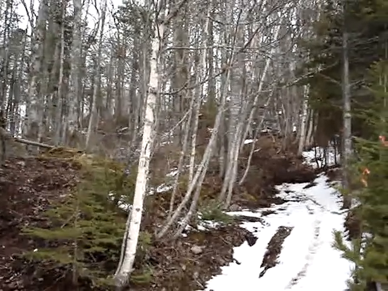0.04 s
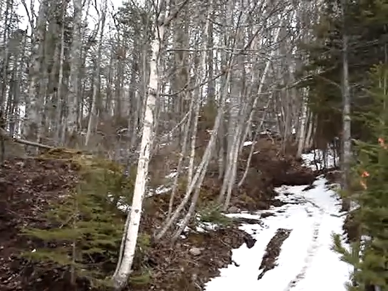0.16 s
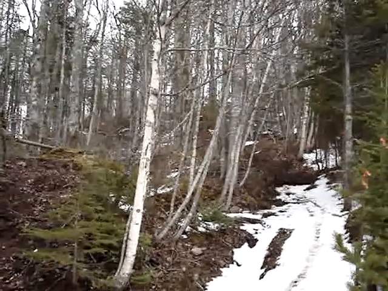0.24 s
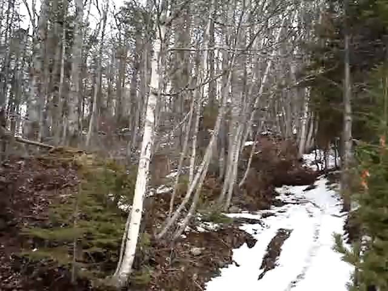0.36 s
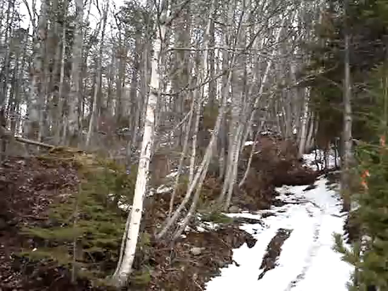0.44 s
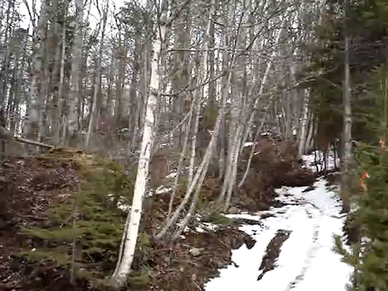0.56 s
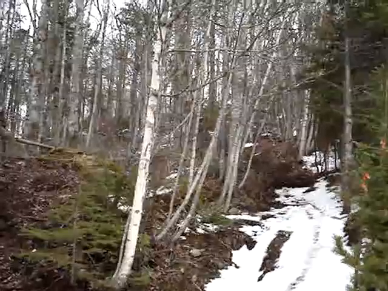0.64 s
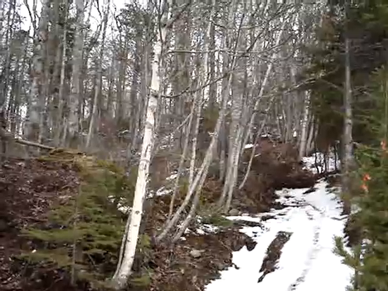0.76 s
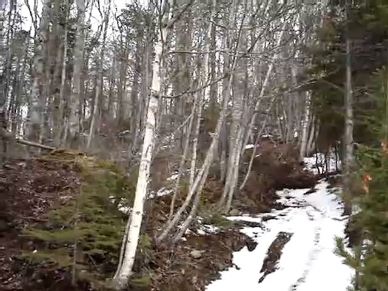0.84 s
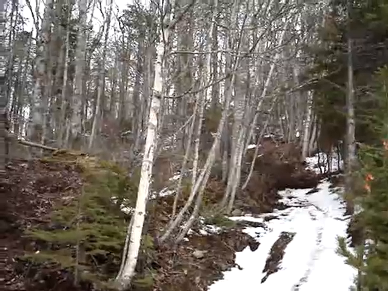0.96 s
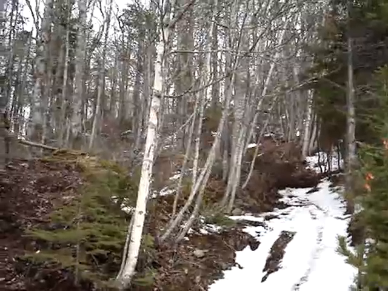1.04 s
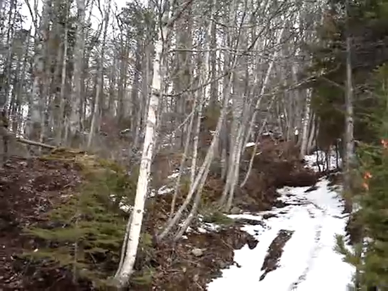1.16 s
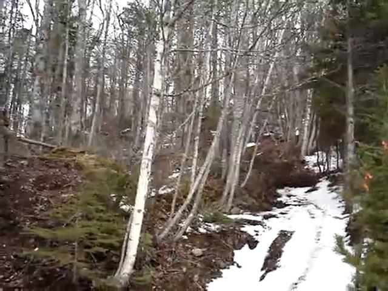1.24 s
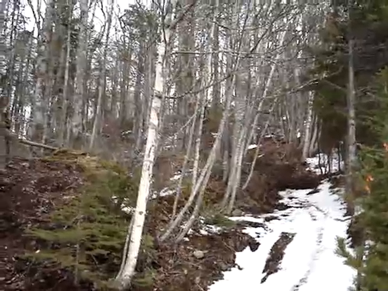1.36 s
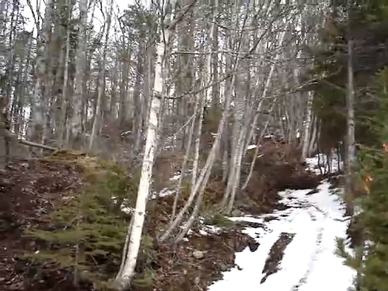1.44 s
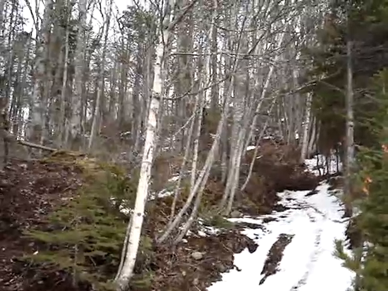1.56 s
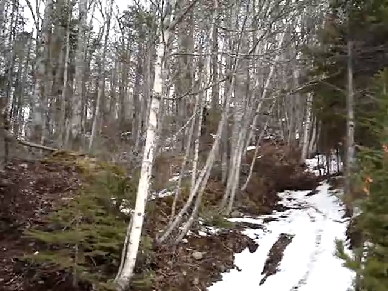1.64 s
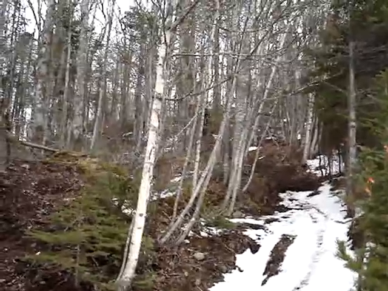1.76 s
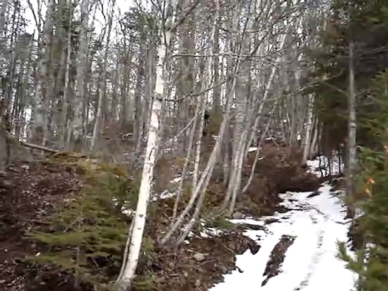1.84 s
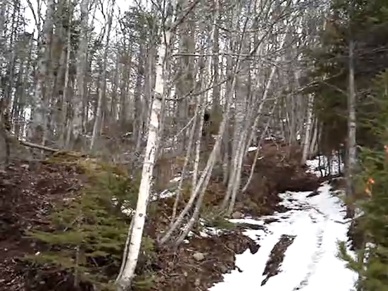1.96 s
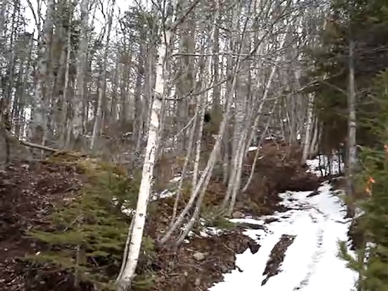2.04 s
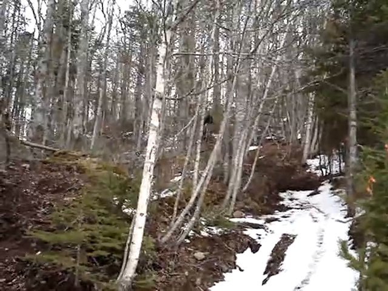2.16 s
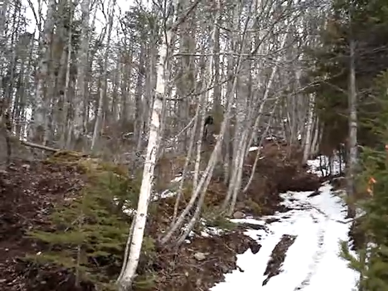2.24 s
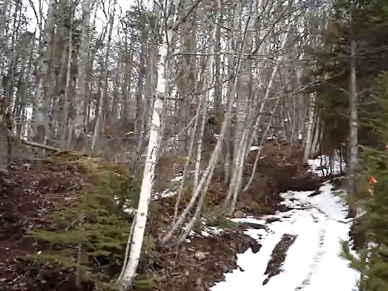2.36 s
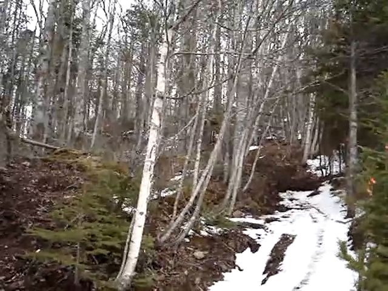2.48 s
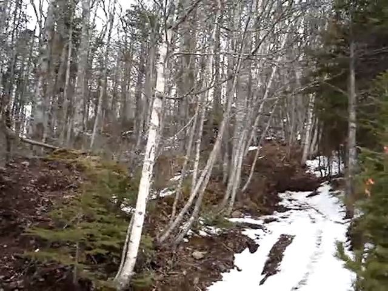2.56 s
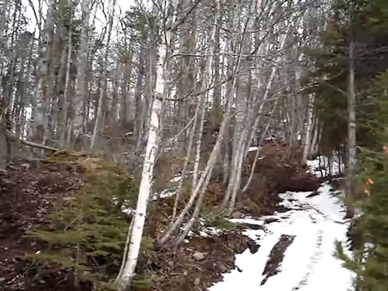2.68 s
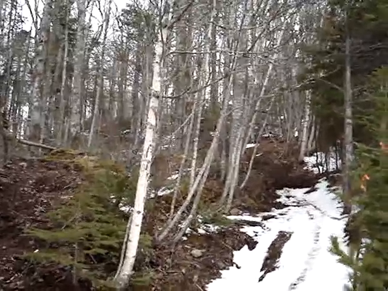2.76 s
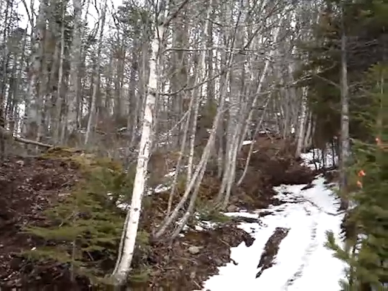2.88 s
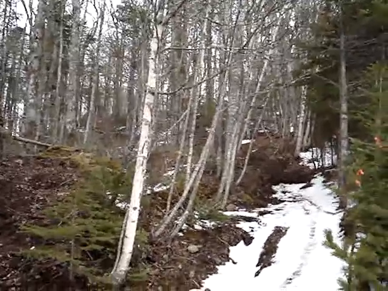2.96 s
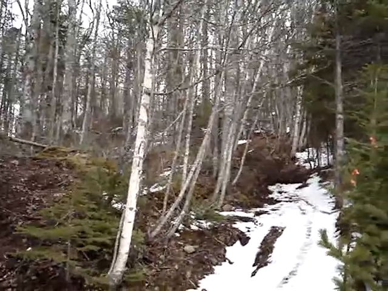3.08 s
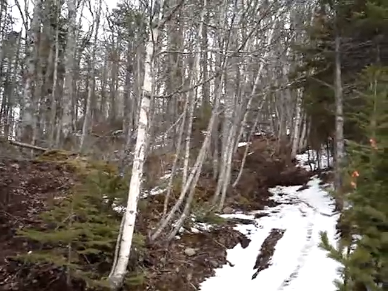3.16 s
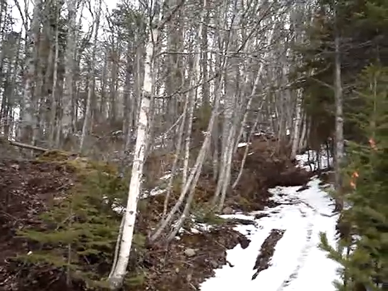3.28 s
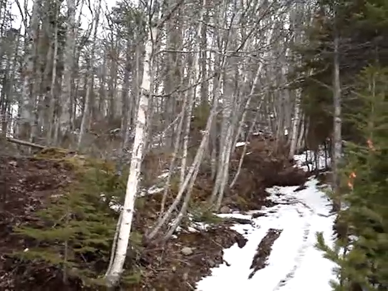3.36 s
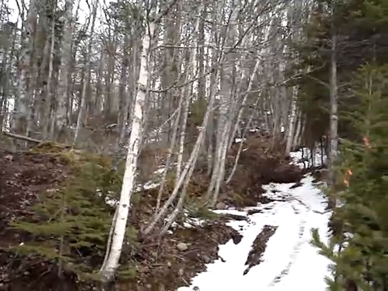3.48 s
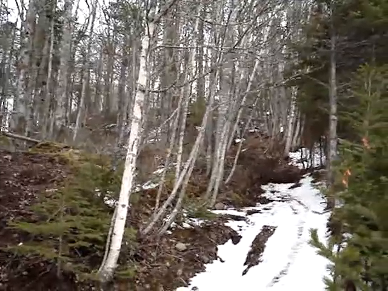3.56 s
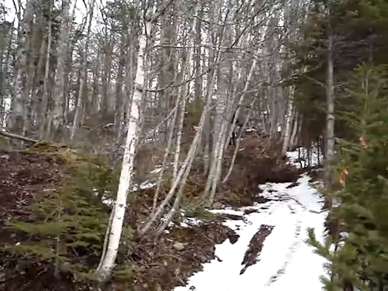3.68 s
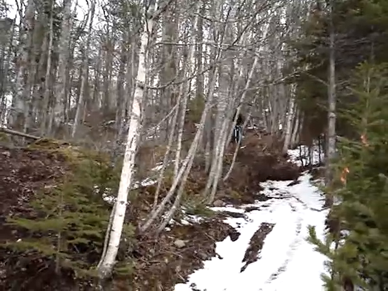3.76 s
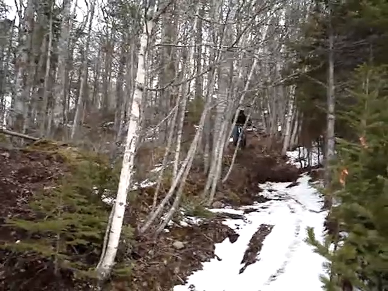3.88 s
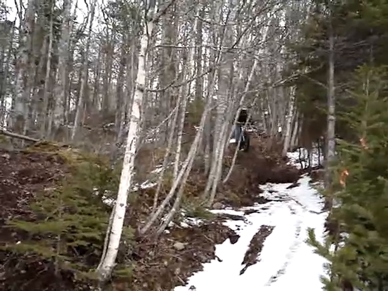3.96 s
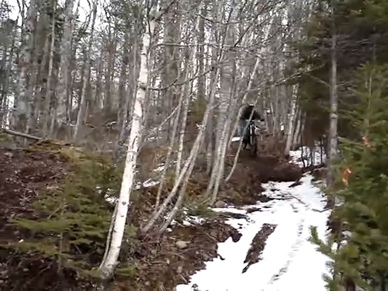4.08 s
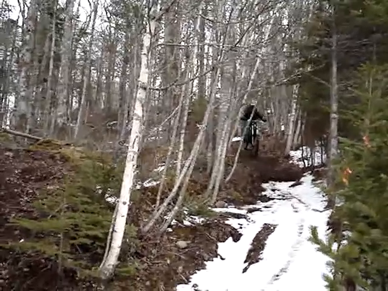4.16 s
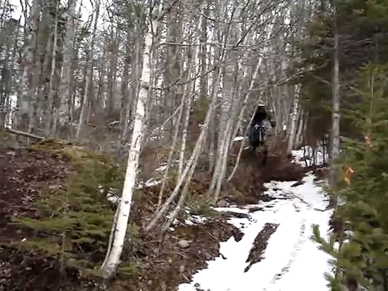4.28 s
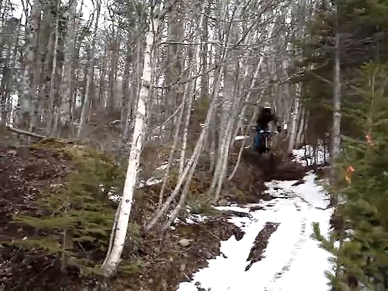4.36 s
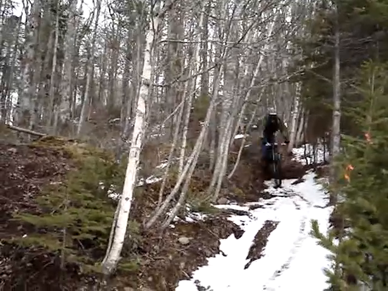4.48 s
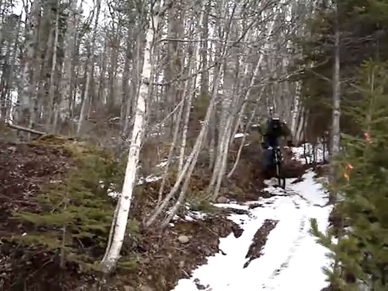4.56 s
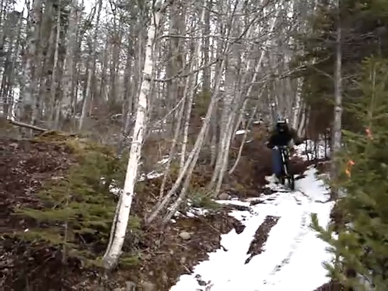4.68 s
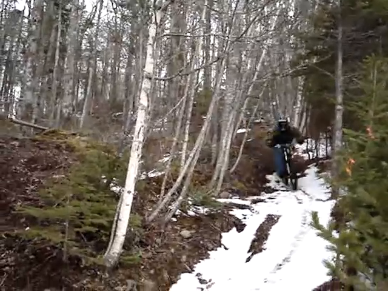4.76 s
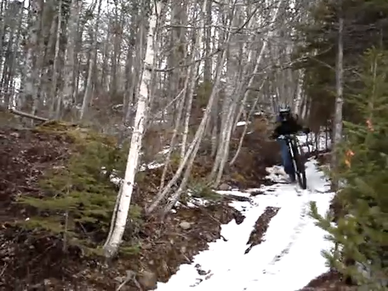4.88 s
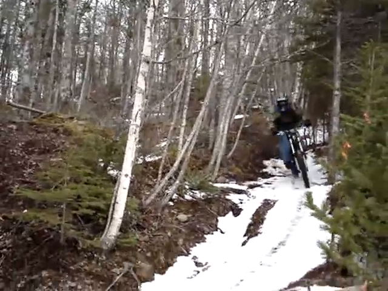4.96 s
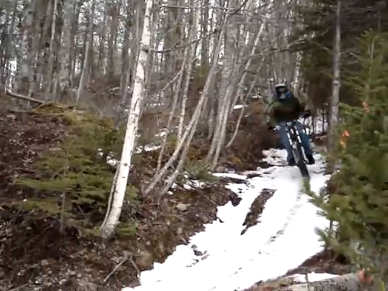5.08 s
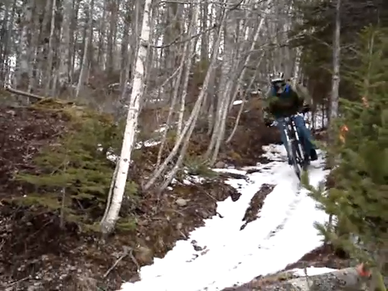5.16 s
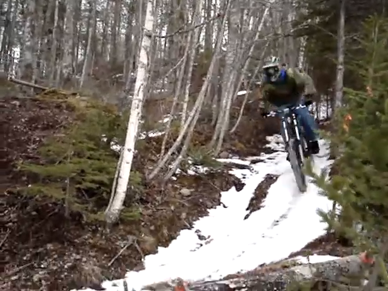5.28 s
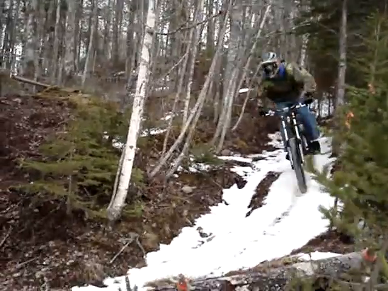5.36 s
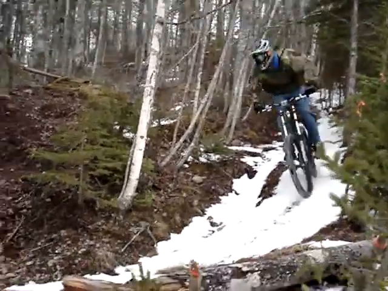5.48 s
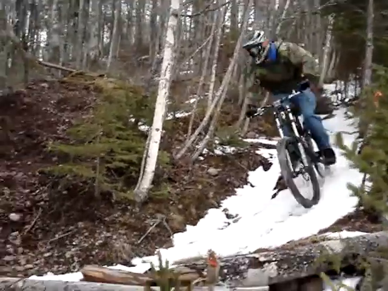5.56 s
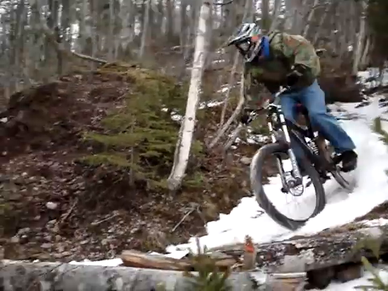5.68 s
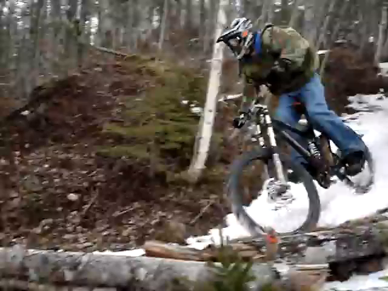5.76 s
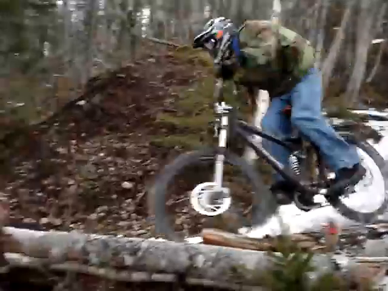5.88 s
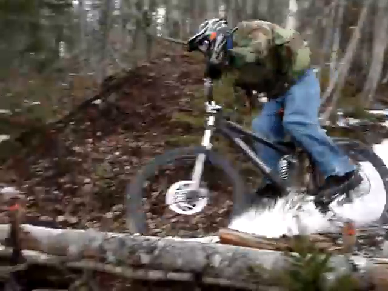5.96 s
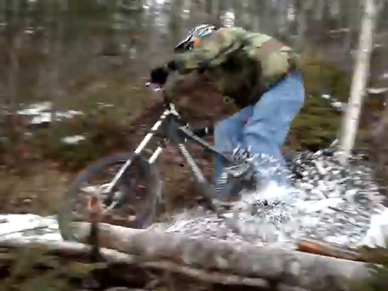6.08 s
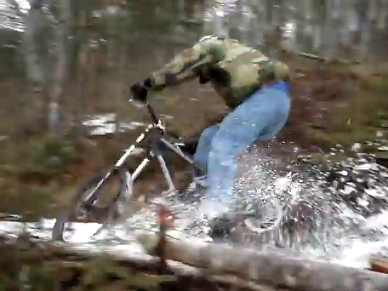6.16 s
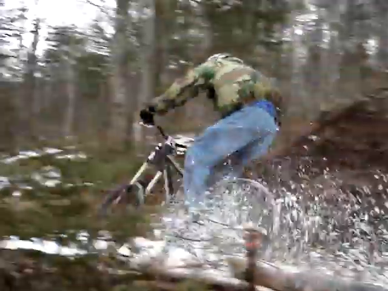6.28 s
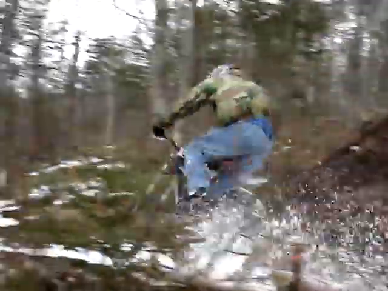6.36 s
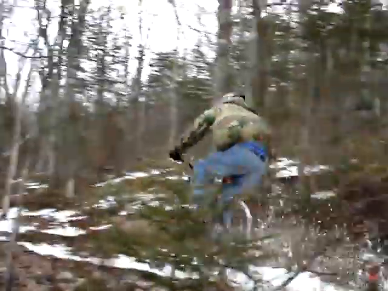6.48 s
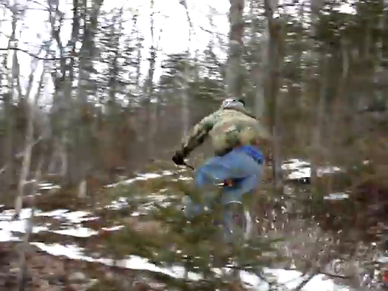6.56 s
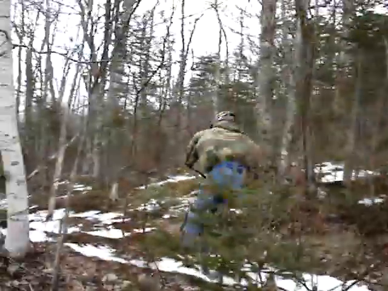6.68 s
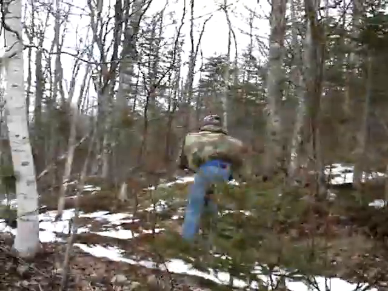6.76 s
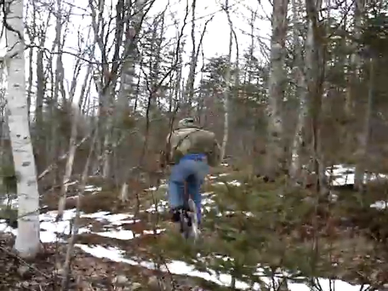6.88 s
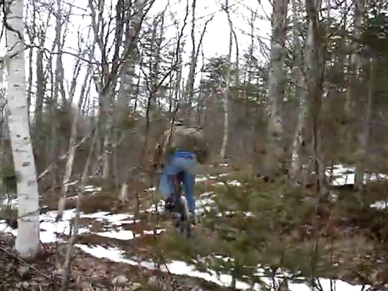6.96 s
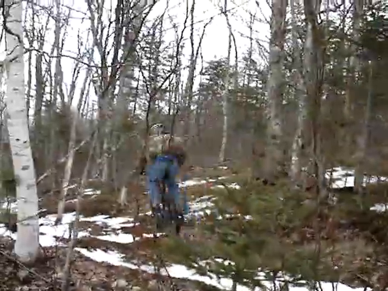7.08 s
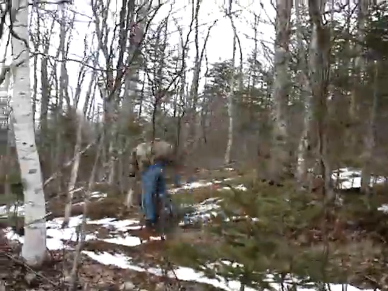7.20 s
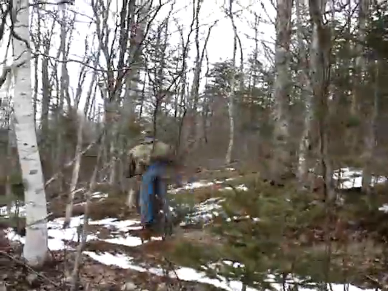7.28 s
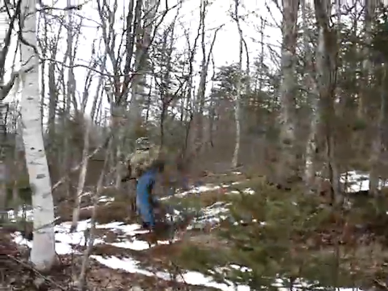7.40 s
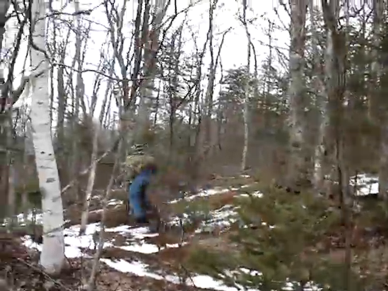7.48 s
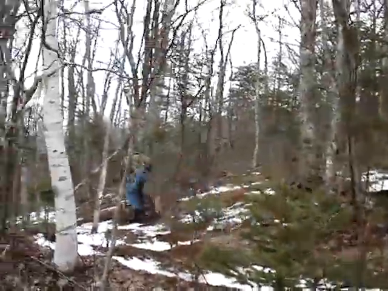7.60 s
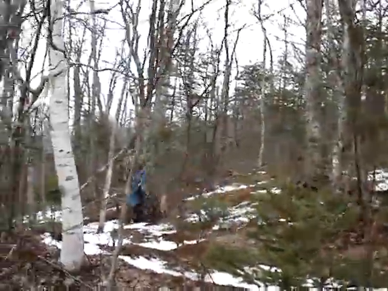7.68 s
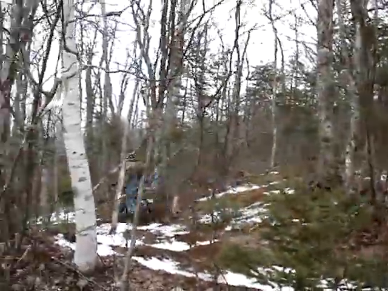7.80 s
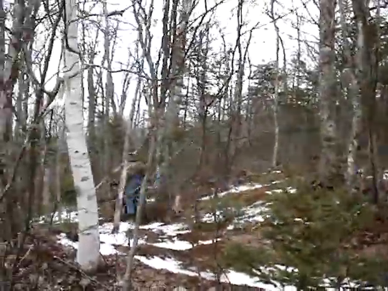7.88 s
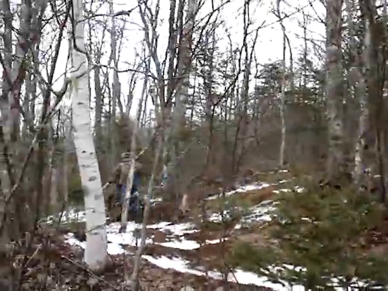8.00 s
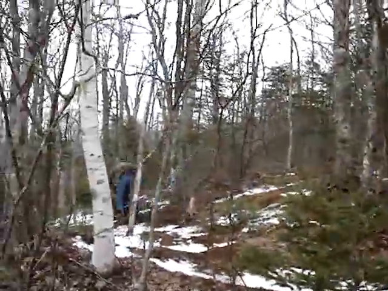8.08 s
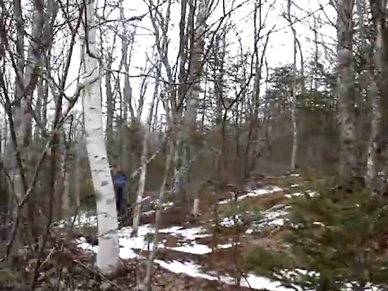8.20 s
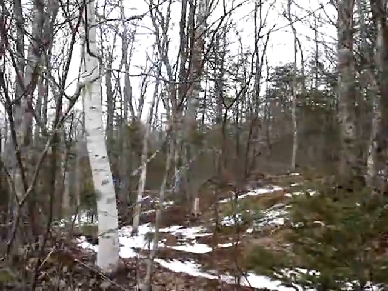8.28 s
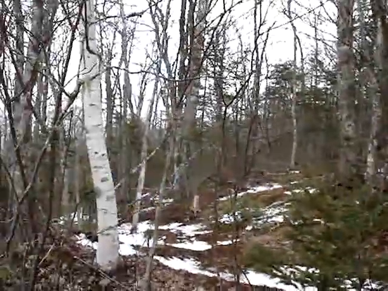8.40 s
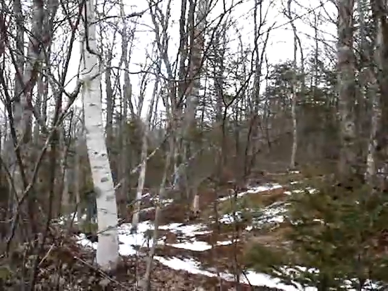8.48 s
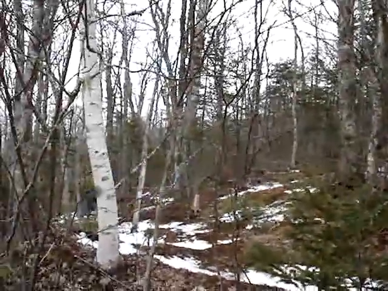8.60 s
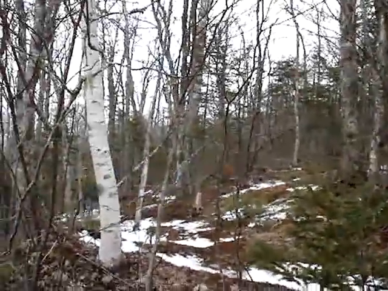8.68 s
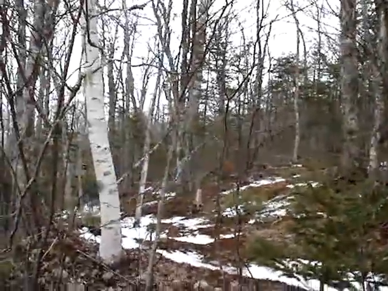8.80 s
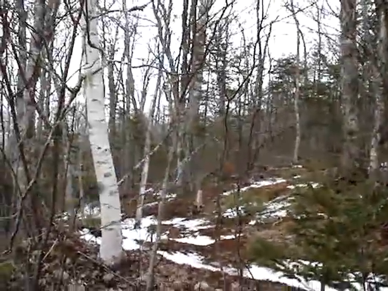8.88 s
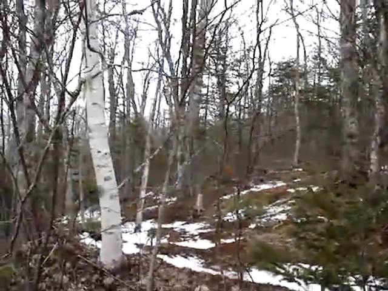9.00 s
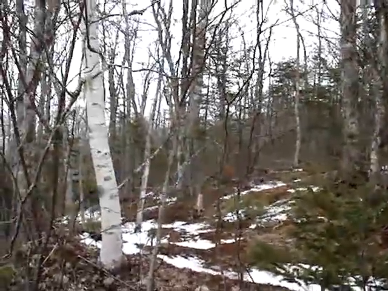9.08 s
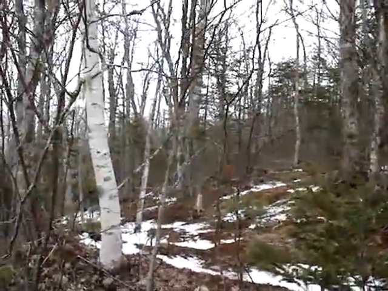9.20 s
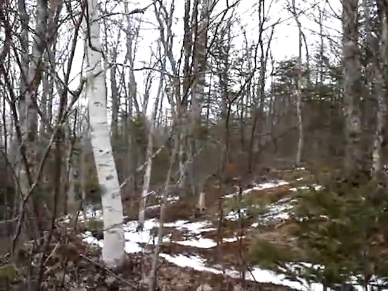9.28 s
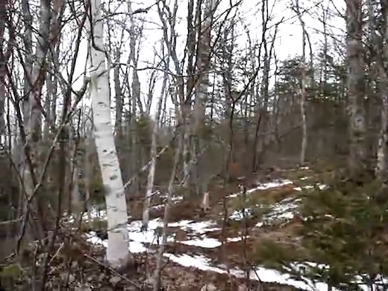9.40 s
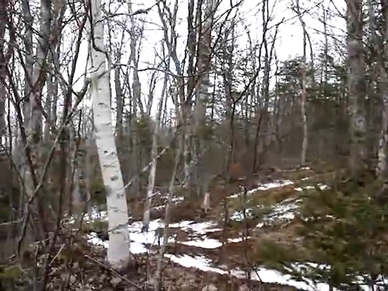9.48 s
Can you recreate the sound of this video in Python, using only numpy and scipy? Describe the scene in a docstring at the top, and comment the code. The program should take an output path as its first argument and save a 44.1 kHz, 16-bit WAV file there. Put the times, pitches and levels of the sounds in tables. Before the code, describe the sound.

Outdoors in quiet woods, a small handheld camera picks up soft hiss, a thin whine and brief wind puffs. Sparse twig snaps grow into a clatter of breaking sticks and crunching tyres as a mountain bike descends. It passes very close around six seconds with hard knocks, thumps and slushy spray, then hisses away, leaving faint freewheel ticks and finger taps on the camera.

```python
"""A mountain bike rolls down a woodland trail over sticks, dirt and wet snow, passes close by and rides off.
Its tyres are grit noise shaped into crunch, spray and boom; sticks are ringing blows with cracks and crumbs.
Late on, the freewheel ticks and fingers tap the body of a small camera, both built on decaying sines.
Low noise is the wind at the microphone early on, later the ground rumbling under the bike; slow pulses
make single wind puffs. Behind it all lie a soft woodland hiss and a thin whine."""
import sys
import numpy as np
from scipy import signal
from scipy.fft import rfft, irfft, next_fast_len
from scipy.io import wavfile
from scipy.ndimage import uniform_filter1d

SR = 44100
rng = np.random.default_rng(int(sys.argv[2]) if len(sys.argv) > 2 else 0)


def dump_mix(stems):
    """Bounce the given channels to the path in sys.argv[1] as a 16-bit WAV at rate SR."""
    frames = np.atleast_2d(stems).T  # one column per channel
    limited = np.clip(frames, -1, 1)  # hard clip at full scale
    pcm = np.round(limited * 32767).astype(np.int16)
    wavfile.write(sys.argv[1], SR, pcm)


N = 420713

# Rolling tyres as the bike nears, passes and leaves.
# Each row: time in seconds, crunch level in dB, spray level in dB, tyre boom level in dB.
ROLLING = [(0.0, -53.5, -58, -63), (0.3, -62.5, -69, -85), (1.0, -54.5, -54.5, -61.5),
           (1.6, -54, -53.5, -59.5), (2.4, -52, -47.5, -53.5), (3.3, -46, -50, -51),
           (3.6, -45, -42.5, -53.5), (4.0, -42, -43.5, -47.5), (4.43, -48, -48.5, -58),
           (4.79, -35, -38, -38), (5.02, -40, -40.5, -45.5), (5.21, -38, -34.5, -47),
           (5.4, -39.5, -38.5, -45), (5.62, -34.5, -33, -38), (5.675, -34.5, -36, -43),
           (5.74, -25.5, -30.5, -40), (5.88, -25, -28, -36), (5.98, -22, -28.5, -39),
           (6.045, -25, -30, -32.5), (6.16, -27.5, -31.5, -34), (6.4, -31, -31, -37.5),
           (7.0, -37.5, -32, -42), (7.29, -39, -34, -44.5), (7.42, -38.5, -32.5, -36),
           (7.8, -45.5, -40.5, -48), (7.97, -43, -38, -41.5), (8.3, -54.5, -48, -52.5),
           (8.7, -49.5, -46, -52), (9.0, -55.5, -50.5, -56.5), (9.54, -51.5, -45, -48.5)]


def amp(db):
    """Turns decibels into a linear gain."""
    return 10 ** (np.asarray(db) / 20)


def evened(x):
    """Scales a sound to an rms of 1."""
    return x / np.sqrt(np.mean(x ** 2) + 1e-20)


def curves(rows):
    """Every column of a table at every sample."""
    s, *columns = np.transpose(rows)
    return [np.interp(np.arange(N) / SR, s, c) for c in columns]


def add(mix, s, sound):
    """Adds a sound to the mix in place, from s seconds on."""
    part = mix[round(s * SR):][:len(sound)]
    part += sound[:len(part)]


def coloured(x, spectrum):
    """Filters x by a spectrum drawn over log frequency, flat beyond its end points."""
    f, db = np.transpose(spectrum)
    size = next_fast_len(len(x))
    hz = np.fft.rfftfreq(size, 1 / SR)
    gain = amp(np.interp(np.log(hz + 1), np.log(f + 1), db))
    return irfft(rfft(x, size) * gain, size)[:len(x)]


def resonate(x, hz, width_hz):
    """A resonance that may glide: shifts the curve hz down to zero, smooths, and shifts back."""
    turn = np.exp(2j * np.pi * np.cumsum(hz * np.ones(len(x))) / SR)
    r = np.exp(-np.pi * width_hz / SR)
    return 2 * (turn * signal.lfilter([1 - r], [1, -r], x / turn)).real


def flicker(per_s):
    """Slow random curve within +-1.6 that heads for a new value per_s times a second."""
    steps = rng.standard_normal(int(N / SR * 400) + 2)
    return np.interp(np.arange(N) / SR * min(per_s, 400), np.arange(len(steps)), np.clip(steps, -1.6, 1.6))


def grit(per_s, spread_db, bed, clump_db, clumps_per_s):
    """Breaking crystals: clicks of uneven size over a bed of finer ones, arriving in clumps."""
    draw, size, fine = rng.random(N), rng.exponential(1, N), rng.standard_normal(N)
    clicks = np.sign(fine) * amp(spread_db * np.minimum(size, 4)) * (draw < per_s / SR)
    return (evened(clicks) + bed * fine) * amp(clump_db * flicker(clumps_per_s))


def tyres():
    """Snow packs with a dull crunch, slush flies off as hiss, the tyre cavity booms."""
    # Colour of the spray. Each row: frequency in Hz, relative level in dB.
    spray_spectrum = [(710, -28), (1200, -25), (1770, 1.5), (3020, 3), (3450, 3.5), (6360, -2),
                      (10000, -17), (13000, -82), (22000, -120)]
    crunch_db, spray_db, boom_db = curves(ROLLING)
    along, wet = slush()

    crunch_hz = 880 * (1 + 0.25 * flicker(10))  # the crunch drifts about one pitch
    crunch = resonate(resonate(grit(800, 2.25, 0.77, 2.5, 60), crunch_hz, 1500), crunch_hz, 2400)
    crunch = signal.lfilter(*signal.butter(2, [380, 2600], "band", fs=SR), crunch)

    # a bright band that rises along the wet stretch, and fizz above it
    band_hz = 4500 + (5760 - 4500) * along
    band_dry_db, band_wet_db, fizz_dry_db, fizz_wet_db = -12, -3.5, -9.5, -6  # against the broad spray
    band_db = band_dry_db + (band_wet_db - band_dry_db) * wet
    fizz_db = fizz_dry_db + (fizz_wet_db - fizz_dry_db) * wet
    fizz_db = fizz_db - 7.5 * (1 - along) * (1 - wet)  # dry ground ahead of the snow fizzes less
    drops, mist = grit(2000, 4.5, 0.37, 2.9, 60), grit(4000, 2.7, 0.35, 5.6, 60)
    band = resonate(resonate(drops, band_hz, 1100), band_hz, 1400)
    fizz = resonate(resonate(mist, 7860, 2100), 6540, 1400)
    spray = evened(coloured(grit(2000, 4.0, 1.0, 3.2, 55), spray_spectrum))
    spray = spray + amp(band_db) * evened(band) + amp(fizz_db) * evened(fizz)

    ahead_hz, past_hz = 217, 254  # air cavity of the tyres, a little higher from behind
    tyre_hz = ahead_hz + (past_hz - ahead_hz) * along
    boom = resonate(resonate(grit(400, 1.54, 0.79, 2.8, 25), tyre_hz, 204), tyre_hz, 340)

    layers = surging(crunch_db, column=2) * evened(crunch)
    layers = layers + surging(spray_db, column=3) * evened(spray)
    # each surge also thumps the tyre, 12 dB under its crunch
    return layers + surging(boom_db, column=2, under_db=-12) * evened(boom)


def surging(steady_db, column, under_db=0):
    """The steady level of a tyre layer with the surges added in power."""
    # The tyres bite through crust in surges.
    # Each row: centre in seconds, length in seconds, crunch level in dB, spray level in dB.
    surges = [(0.082, .16, -52, -55), (0.898, .03, -66, -47), (1.067, 0.15, -55, -56),
              (1.178, 0.025, -58, -49), (1.523, .02, -59, -45.5), (1.598, 0.032, -52, -45),
              (2.078, 0.053, -52, -42), (2.242, 0.026, -44.5, -37), (3.431, 0.073, -42, -34.5),
              (3.47, 0.034, -34.5, -30.5), (3.579, 0.026, -38, -43), (4.108, 0.087, -46, -39),
              (4.172, 0.081, -33.5, -47), (4.203, 0.048, -36, -29.5), (4.253, 0.065, -45, -39),
              (4.345, 0.035, -38, -34.5), (4.429, 0.027, -40.5, -33.5), (4.476, 0.02, -40, -38.5),
              (4.54, 0.02, -40, -36), (4.705, 0.04, -35, -42), (4.742, 0.033, -31, -37),
              (4.837, 0.03, -37, -44), (4.617, 0.029, -29.5, -31.5), (4.641, .04, -43, -31.5),
              (4.77, 0.03, -25, -33), (4.797, 0.043, -44, -33), (4.9, 0.029, -34, -33.5),
              (5.086, 0.088, -32, -52), (5.195, 0.11, -35, -46), (5.269, 0.026, -30.5, -38),
              (5.61, 0.018, -22, -46), (5.709, 0.063, -22.5, -37), (5.932, 0.097, -20.5, -40),
              (5.956, 0.029, -20, -35), (6.084, 0.061, -17, -36), (6.12, 0.055, -23, -42),
              (6.162, 0.17, -28, -27.5), (6.302, 0.06, -25, -33), (6.676, 0.12, -27.5, -34),
              (6.704, 0.048, -27.5, -34), (6.86, 0.066, -28.5, -50), (7.032, 0.022, -32, -48),
              (7.187, 0.03, -30, -39), (7.261, 0.06, -30.5, -25.5), (7.325, 0.03, -27, -26.5),
              (7.428, 0.06, -31, -36), (7.596, 0.034, -40, -32), (7.737, 0.049, -37, -33.5),
              (7.983, 0.061, -37, -36), (8.067, 0.034, -45, -38), (8.195, 0.049, -40.5, -45),
              (8.432, 0.046, -67, -39), (8.504, 0.033, -49, -39)]
    rise, fall = 0.2, 0.52  # shares of a surge's length
    power = amp(steady_db) ** 2
    for row in surges:
        length = np.clip(row[1], .01, .2)
        u = np.arange(0, 1, 1 / (length * SR))
        shape = np.minimum(np.minimum(u / rise, (1 - u) / fall), 1)
        add(power, row[0] - length / 2, (amp(row[column] + under_db) * shape) ** 2)
    return np.sqrt(power)


def slush():
    """How far along the wet stretch the bike is (0-1), and how wet the ground is (0-1)."""
    from_s, to_s, edge_s = 4.67, 7.47, 0.29
    t = np.arange(N) / SR
    along = np.clip((t - from_s) / (to_s - from_s), 0, 1)
    wet = np.clip(np.minimum(t - from_s, to_s - t) / edge_s + .5, 0, 1)
    return along, wet


def snaps():
    """Each break is a blow that rings briefly, a bright crack, and crumbs falling after."""
    # Sticks and crust breaking; each sounds 1.22 ms after its listed time.
    # Each row: time in seconds, knock level in dB, knock pitch in Hz, crack level in dB, crack pitch in Hz.
    sticks = [(0.927, -23.5, 520, -41.5, 3480), (1.212, -35, 650, -48, 3500), (1.353, -38, 700, -40, 2400),
              (1.746, -32, 800, -37, 4300), (1.749, -27.5, 480, -40, 2400),
              (1.896, -28.5, 537, -37.5, 2930), (2.064, -35, 794, -23.5, 5150),
              (2.229, -47, 1950, -33.5, 2550), (2.863, -23.5, 1110, -30, 2040),
              (2.866, -26, 1400, -35, 3400), (3.175, -25, 594, -50, 2680), (3.3935, -14, 1310, -22.5, 2200),
              (3.3945, -6.5, 338, -39, 2000), (3.401, -23, 750, -40, 2400),
              (3.4483, -16, 1240, -14.5, 2500), (3.4493, -14, 1880, -25, 5200),
              (3.4605, -30, 1000, -39, 2600), (3.4715, -33, 900, -30, 4500), (3.574, -28, 982, -34, 2690),
              (3.793, -22.5, 1030, -44, 3070), (3.89, -23.5, 1070, -49, 4210),
              (4.006, -18.5, 996, -27.5, 3400), (4.085, -20.5, 1010, -23, 3430),
              (4.117, -19, 1030, -30, 3020), (4.149, -16.5, 1100, -30, 3620), (4.18, -21, 1140, -23, 3050),
              (4.196, -25, 1100, -29, 3000), (4.3275, -19, 1170, -38, 2500), (4.335, -20, 1230, -36, 2500),
              (4.416, -24, 1700, -27, 3000), (4.421, -27, 1220, -31, 3700),
              (4.461, -14.5, 450, -27.5, 7000), (4.4605, -19, 1400, -33, 3500),
              (4.531, -15.5, 1350, -24.5, 3200), (4.537, -27, 1500, -29, 4300),
              (4.566, -22, 1530, -30, 2150), (4.596, -25, 1420, -33, 3000), (4.615, -17, 1100, -33, 2530),
              (4.645, -26, 1200, -24, 4170), (4.688, -20, 493, -27.5, 4870), (4.704, -17, 600, -37, 5500),
              (4.7315, -13, 450, -33, 3100), (4.744, -19, 810, -24.5, 3500), (4.757, -12, 1350, -27, 4800),
              (4.761, -16, 1430, -17, 4800), (4.765, -27, 700, -16.5, 6730), (4.769, -18, 577, -16, 4500),
              (4.78, -29, 1000, -31, 5200), (4.792, -9.5, 470, -29, 4600), (4.816, -30, 1000, -28, 6560),
              (4.829, -23, 1000, -31, 3800), (4.9572, -13, 1340, -21, 3900),
              (4.9588, -1.5, 850, -15.5, 3160), (4.9965, -12.5, 784, -26, 2000),
              (5.542, -16, 637, -26, 5090), (5.601, -13.5, 820, -37, 2000), (5.686, -8.5, 850, -42, 2130),
              (5.699, -3.5, 776, -40, 2000), (5.722, -3, 620, -40, 2000), (5.762, -6, 795, -42, 2060),
              (5.7645, -1.5, 810, -44, 2000), (5.768, -9, 794, -44, 2000), (5.777, -7.5, 844, -39, 2000),
              (5.81, -19, 1050, -38, 2000), (5.829, -33, 840, -21, 2900), (5.858, -14, 1100, -31, 2000),
              (5.897, -16, 795, -38, 2260), (5.924, -1, 1000, -31, 2000), (5.949, -14, 1280, -16.5, 5270),
              (5.954, -2.5, 970, -25, 5180), (6.021, -29, 1600, -16, 5050), (6.064, 3, 1130, -35, 2030),
              (6.0735, -5, 1400, -34, 2000), (6.08, -7, 1310, -33, 2000), (6.0835, -3, 1300, -30, 2000),
              (6.087, -9, 1390, -33, 2000), (6.0945, -5, 840, -30, 2000), (6.0985, -2, 750, -36, 2000),
              (6.1045, -9, 900, -36, 2000), (6.279, -15, 1210, -24, 2050), (6.289, -14, 1620, -30, 2050),
              (6.307, -23, 1020, -15, 2390), (6.314, -26, 1500, -19, 2390), (6.376, -23, 780, -23, 2470),
              (6.421, -18, 1830, -20, 2350), (6.453, -30, 1980, -14.5, 2630), (6.527, -17, 1730, -21, 2600),
              (6.531, -25, 1500, -18, 2500), (6.561, -16, 1900, -22, 4850), (6.577, -23, 1500, -20, 2200),
              (6.613, -17, 1810, -21, 2400), (6.658, -24, 1500, -19.5, 2600), (6.703, -7.5, 860, -19, 2040),
              (6.729, -27, 1500, -26, 3600), (6.825, -27, 1200, -23.5, 3000), (6.848, -11, 780, -37, 2200),
              (6.881, -34, 1040, -18.5, 4540), (7.029, -19, 1110, -24, 1990), (7.15, -14.5, 300, -32, 2400),
              (7.156, -7, 296, -38, 2000), (7.175, -12.5, 930, -22, 2300), (7.176, -19, 1700, -35, 2700),
              (7.194, -26, 1500, -26, 2200), (7.235, -18, 2740, -17.5, 5700),
              (7.246, -22, 1680, -13.5, 3360), (7.258, -18, 1380, -21, 6140), (7.3, -32, 1800, -21, 2800),
              (7.316, -18, 1900, -22.5, 2400), (7.322, -12, 1210, -22, 2190), (7.408, -15, 725, -28, 3500),
              (7.424, -34, 1290, -34, 2200), (7.436, -17, 786, -38, 2200), (7.4603, -20, 825, -19, 6350),
              (7.4608, -18, 3320, -32, 3400), (7.5145, -14, 3450, -36, 3380), (7.515, -17, 524, -36, 3400),
              (7.5185, -19, 3500, -36, 3400), (7.5215, -22, 2700, -36, 3400),
              (7.716, -20.5, 800, -24.5, 3800), (7.718, -16, 1780, -26, 2580),
              (7.852, -29, 2000, -26, 3000), (7.947, -20, 350, -40, 2400), (8.074, -25.5, 1460, -42, 2400),
              (8.177, -25, 644, -35, 2100), (8.241, -29, 1700, -31, 3150), (8.621, -28, 1640, -27, 3200),
              (8.827, -43, 1500, -38, 2680)]
    # Shared colour of the cracks. Each row: frequency in Hz, relative level in dB.
    crack_spectrum = [(900, -41), (2000, 2), (3500, 0), (6000, 3.5), (8000, -0.5), (10500, -13)]
    out, t = np.zeros(N), np.arange(2600) / SR
    rows = sticks + twigs()
    noise = rng.standard_normal((len(rows), 3, len(t)))
    decay = amp(-60 * t / 0.013)
    for (s, knock_db, hz, crack_db, crack_hz), (low, high, lumps) in zip(rows, noise):
        # lumpy tail that starts around 14.5 dB down
        crumbs = amp(-14.5 - 60 * t / 0.045 + 0.71 * evened(uniform_filter1d(lumps, size=60)))

        blow = decay * np.minimum(t * hz / 0.67, 1)  # builds within a cycle
        splinters = evened(resonate(resonate(low, 0.96 * hz, 1.8 * hz), 0.62 * hz, 2.6 * hz))
        modes = np.sin(2 * np.pi * hz * t) + 0.13 * np.sin(2 * np.pi * 2.31 * hz * t)
        knock = blow * (modes + 0.2 * splinters) + 0.27 * crumbs * splinters

        bright = evened(coloured(high, crack_spectrum))
        own_pitch = evened(resonate(resonate(bright, crack_hz, 1600), crack_hz, 3000))
        bright = 0.56 * bright + own_pitch
        split = 0.99 * amp(-60 * t / 0.0034) * np.sin(2 * np.pi * crack_hz * t)  # one sharp click
        crack = (decay + crumbs) * evened(bright) + split
        add(out, s + 0.00122, amp(knock_db) * knock + amp(crack_db) * crack)
    return thin(out)


def twigs():
    """Forty small breaks like those of the sticks, at random times, as loud as the tyres are near."""
    s, pitch, size, bright = rng.random((40, 4)).T
    s = np.sort(s) * N / SR
    crunch_db, spray_db, _ = (c[(s * SR).astype(int)] for c in curves(ROLLING))
    knock_db = crunch_db + 14 - 8 * size
    crack_db = spray_db + 9 - 8 * size
    return list(zip(s, knock_db, 1000 * (.6 + 1.2 * pitch), crack_db, 3550 * (1.25 + bright)))


def thin(x):
    """Small things radiate little bass: a high-pass at 260 Hz."""
    return signal.lfilter(*signal.butter(2, 260, "high", fs=SR), x)


def freewheel():
    """Pawls drop over the ratchet teeth, fading within each spell of coasting."""
    # Spells of ticking. Each row: first tick in seconds, end in seconds, level of the first tick in dB.
    spells = [(9.0905, 9.245, -29), (9.341, 9.4, -33)]
    ticks_per_s, fade_db_per_s = 59.8, 45
    out, t = np.zeros(N), np.arange(200) / SR
    tick = amp(-60 * t / .003) * (np.sin(2 * np.pi * 3100 * t) + .8 * np.sin(2 * np.pi * 4600 * t))
    for first, last, db in spells:
        for s in np.arange(first, last, 1 / ticks_per_s):
            add(out, s, amp(db - fade_db_per_s * (s - first)) * tick)
    return out


def landings():
    """The wheels land with short thumps: pressure pulses with a main dip and a slight rise on both sides."""
    # Each row: time of the dip in seconds, level in dB, width in seconds.
    thumps = [(3.398, -20.5, 0.00074), (4.736, -19.5, 0.0017), (4.96, -29, 0.0026), (5.832, -18, 0.0012),
              (6.077, -17, 0.00088), (6.098, -29, 0.002), (7.249, -22.5, 0.0011), (7.463, -23, 0.001)]
    return -pushes(thumps)


def pushes(rows):
    """Single low pressure pulses that swing back on both sides."""
    out, t = np.zeros(N), np.arange(-1000, 1000) / SR
    for s, db, width in rows:
        u = t / max(width, .0003)
        add(out, s + t[0], amp(db) * (np.exp(-u ** 2) - 0.14 * np.exp(-(u / 3.5) ** 2)))
    return out


def passing(bike):
    """Tone of the bike as it goes by: a rising dip, thinner low mids once past, duller treble when far."""
    t = np.arange(N) / SR
    along, wet = slush()
    dip_hz = 2320 + (3320 - 2320) * along  # below the bright band of the spray, rising with it
    bike = bike - 0.38 * wet * resonate(bike, dip_hz, 590)

    past = np.clip((t - 5.64) / 0.4, 0, 1)
    bike = bike - 0.65 * past * resonate(bike, 422, 180)

    # among the trees the distant bike loses treble; it dulls again, less so, as it rides off
    near_from_s, near_by_s, leaves_s = 2.35, 3.56, 7.67
    nearing = (near_by_s - t) / (near_by_s - near_from_s)
    leaving = np.minimum((t - leaves_s) / 0.97, 0.42)
    far = np.clip(np.maximum(nearing, leaving), 0, 1)
    treble = bike - signal.lfilter(*signal.butter(2, 5060, fs=SR), bike)
    return bike - 0.52 * far * treble


def trunks(x):
    """Scattered faint echoes from the tree trunks: sparse random taps that die away in 0.27 s."""
    t = np.arange(8000) / SR
    echoes = rng.choice([-1., 1.], len(t)) * (rng.random(len(t)) < .04) * amp(-60 * t / 0.27) * (t > .003)
    return signal.oaconvolve(x, echoes / np.linalg.norm(echoes))[:N]


def taps():
    """Fingers on the camera body: long touches ring mostly its low modes, short ones all of them."""
    # Each row: start in seconds, level in dB, contact time in seconds.
    touches = [(9.1506, -23.5, 0.001), (9.1546, -32, .0004), (9.293, -18.5, .0001)]
    # Modes of the camera case. Each row: frequency in Hz, relative level in dB, 60 dB decay time in seconds.
    case_modes = [(493, 3.5, 0.016), (800, 5, 0.019), (1420, -0.5, 0.025), (1880, 0, 0.021),
                  (2460, -1, 0.016), (3160, -2.5, 0.016), (4150, -4, 0.0093), (5200, -9, 0.0077),
                  (6340, -8, 0.014)]
    out, t = np.zeros(N), np.arange(2000) / SR
    ring = np.zeros(len(t))
    for k, (hz, db, t60) in enumerate(case_modes):
        ring += (-1) ** k * amp(db - 60 * t / t60) * np.sin(2 * np.pi * hz * t)
    ring = ring + amp(-23.0 - 60 * t / .006) * rng.standard_normal(len(t))  # the snap of the button
    for s, db, contact in touches:
        touch = signal.windows.hann(max(round(contact * SR), 3))
        add(out, s, amp(db) * np.convolve(ring, touch / touch.sum()))
    return thin(out)


def rumble_and_puffs():
    """Low rumble: wind at the microphone early on, later the ground under the bike, with single wind puffs."""
    # Strength of the rumble. Each row: time in seconds, level in dB.
    rumble_levels = [(0.0, -50), (0.11, -61), (0.18, -51), (0.22, -56), (0.32, -68), (0.36, -57),
                     (0.43, -50), (0.5, -50), (0.62, -56), (0.68, -66), (0.93, -70), (2.84, -63.5),
                     (4.4, -65), (4.83, -45), (5.18, -66), (6.15, -46.5), (6.5, -64), (7.31, -48.5),
                     (7.7, -70), (8.15, -57.5), (9.54, -70)]
    # Colour of the rumble. Each row: frequency in Hz, relative level in dB.
    rumble_spectrum = [(15, -30), (40, 2), (90, 2), (160, -4), (260, -13), (500, -82)]
    # Wind puffs. Each row: time of the peak in seconds, level in dB, width in seconds.
    puffs = [(.182, -45, 0.0022), (.415, -38, 0.0028), (.462, -27.5, 0.0015), (.552, -28.5, 0.002),
             (.597, -35, 0.0035)]
    rumble = evened(coloured(rng.standard_normal(N), rumble_spectrum))
    lumpy_db = curves(rumble_levels)[0] + 2.6 * flicker(15)
    return amp(lumpy_db) * rumble + pushes(puffs)


def woods():
    """Soft, slightly wavering hiss of the trees and the camera, with a thin steady whine."""
    # Colour of the hiss. Each row: frequency in Hz, relative level in dB.
    hiss_spectrum = [(60, -23), (150, -1.5), (500, 3), (1500, -7.5), (2600, -4.5), (7000, -13),
                     (10500, -21)]
    # Whine of the camera electronics. Each row: frequency in Hz, level in dB.
    whines = [(8123, -72)]
    hiss = amp(-54 + .8 * flicker(6)) * evened(coloured(rng.standard_normal(N), hiss_spectrum))
    for hz, db in whines:
        hiss = hiss + amp(db) * evened(np.sin(2 * np.pi * hz * np.arange(N) / SR))
    return hiss


def scene():
    """The bike with its echoes, then the landings, taps, rumble and woods around it."""
    bike = passing(tyres() + snaps()) + freewheel()
    bike = bike + amp(-20.5) * trunks(bike)
    return (bike + landings() + taps() + rumble_and_puffs() + woods())[None]


def record(dry):
    """Bass loss, soft overload and band limit of the camera."""
    dry = signal.lfilter(*signal.butter(1, 45, "high", fs=SR), dry)  # the small capsule drops the deepest bass
    dry = .62 * np.tanh(dry / .62)  # loud peaks are rounded off
    edge_hz = 10450
    return signal.oaconvolve(dry, signal.firwin(601, edge_hz, window=("kaiser", 9), fs=SR)[None], "same")


dry = scene()
out = record(dry)
dump_mix(out)
```